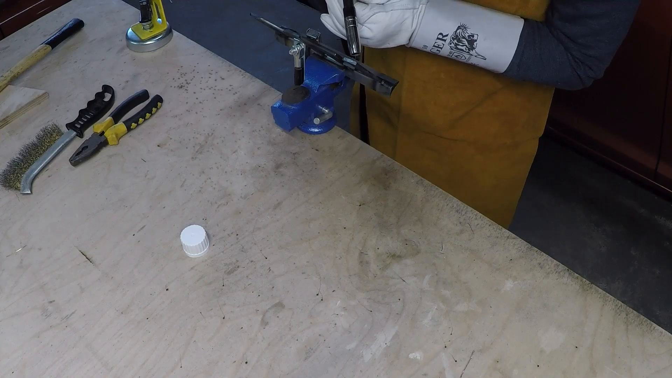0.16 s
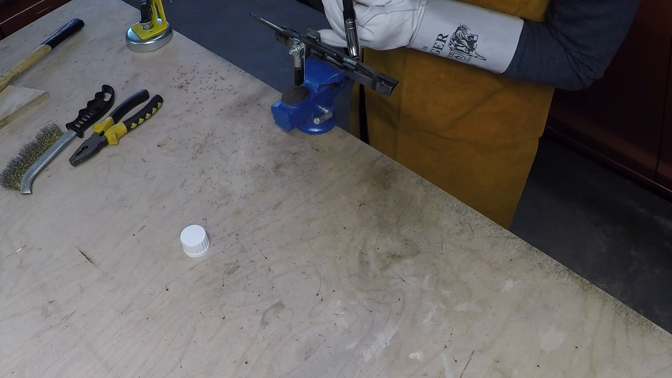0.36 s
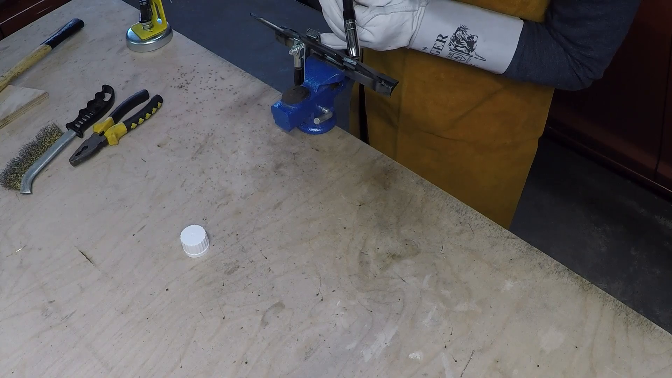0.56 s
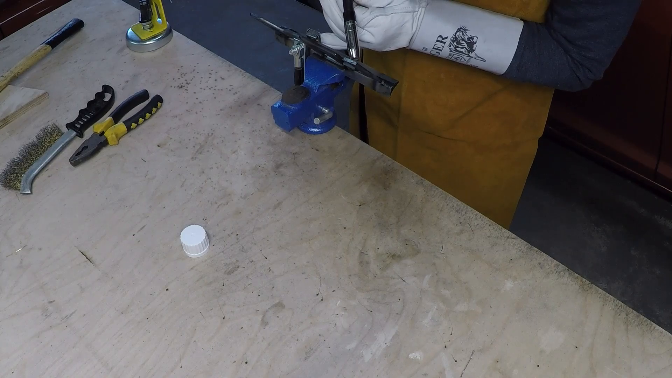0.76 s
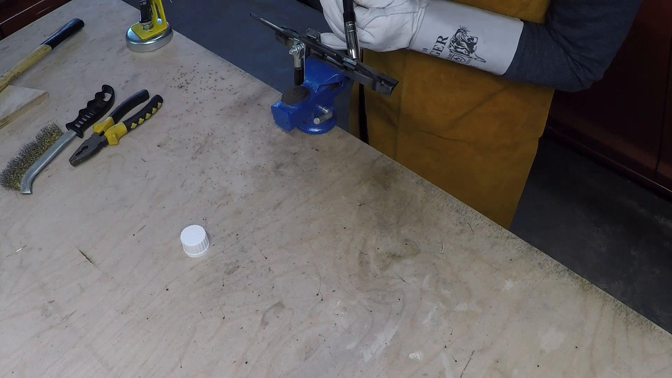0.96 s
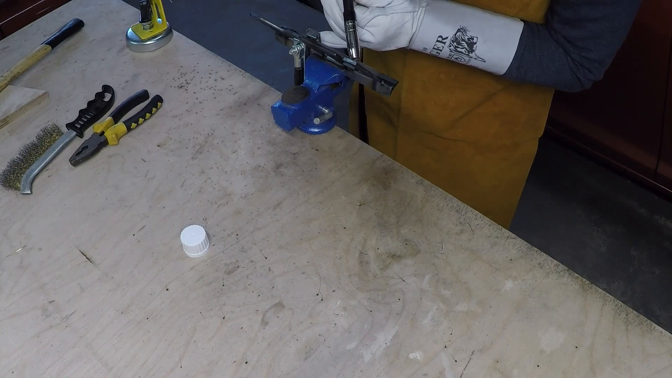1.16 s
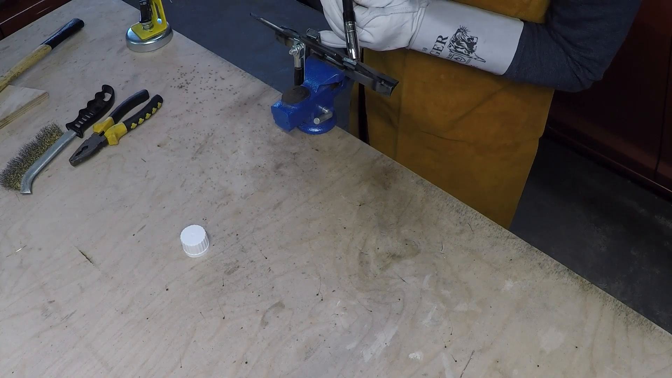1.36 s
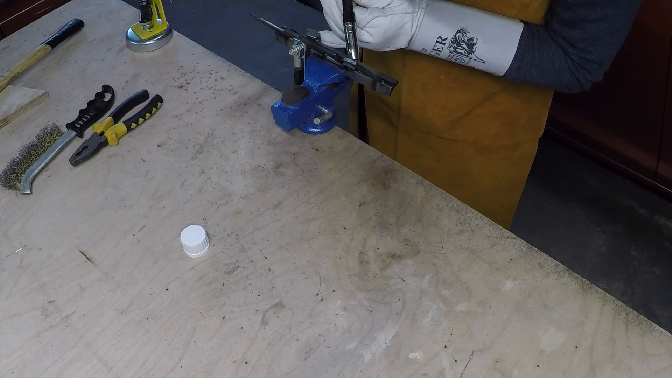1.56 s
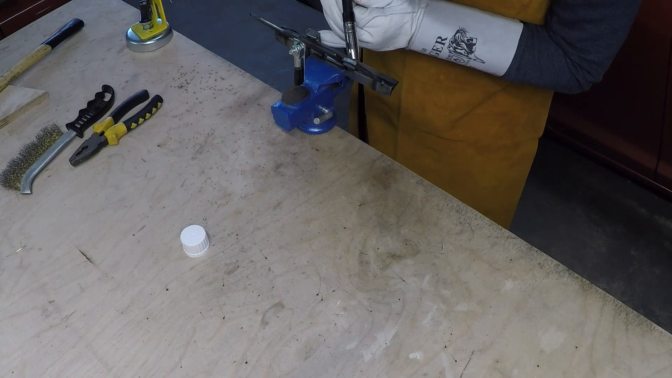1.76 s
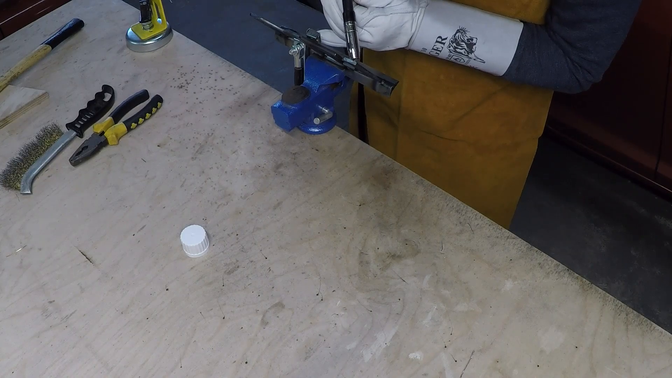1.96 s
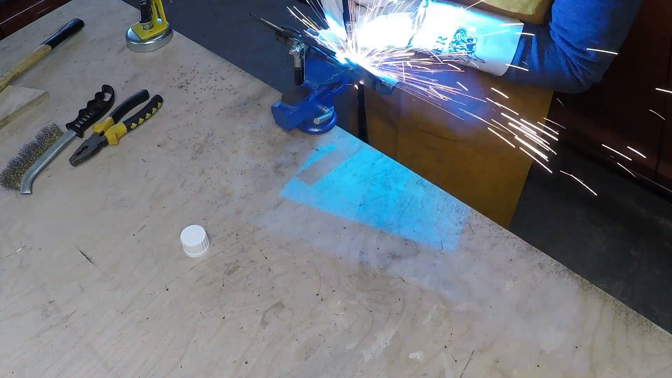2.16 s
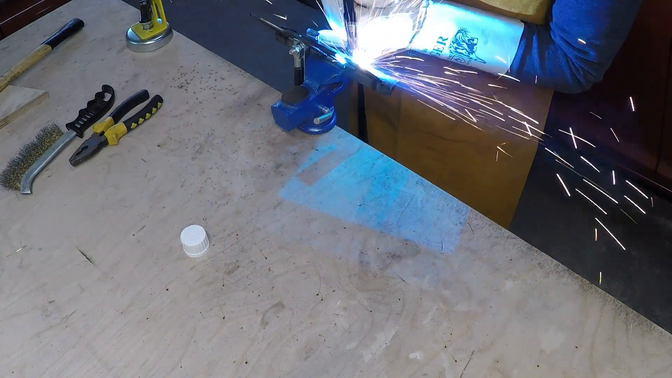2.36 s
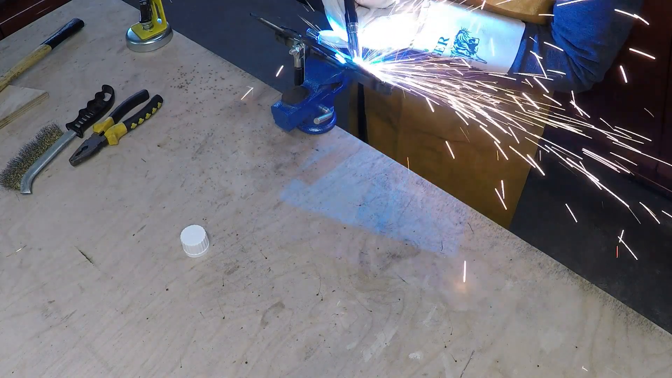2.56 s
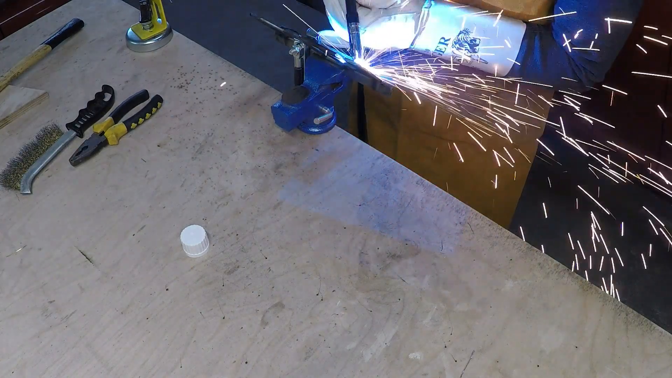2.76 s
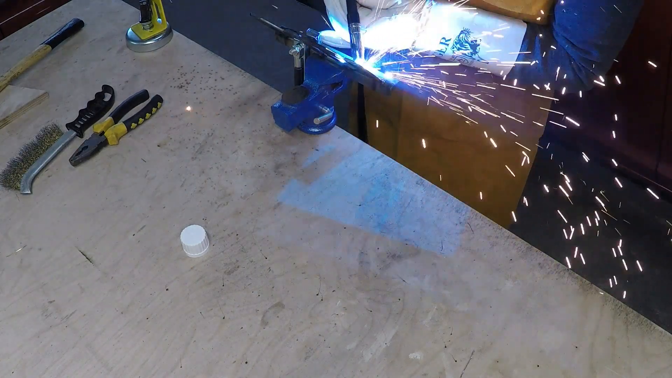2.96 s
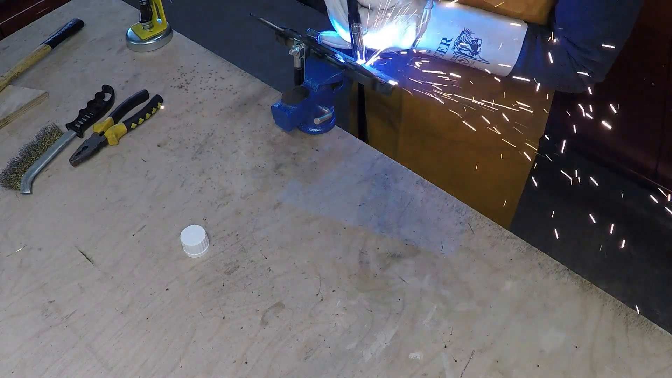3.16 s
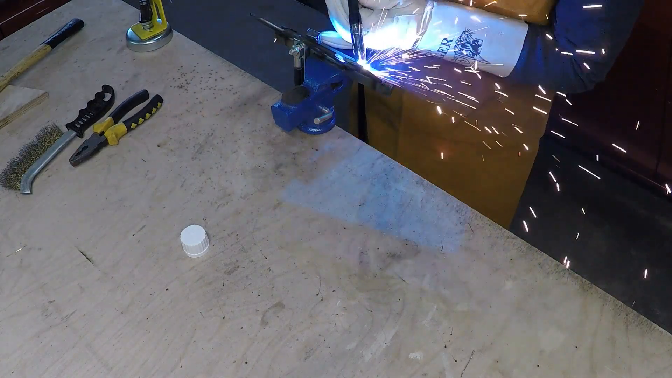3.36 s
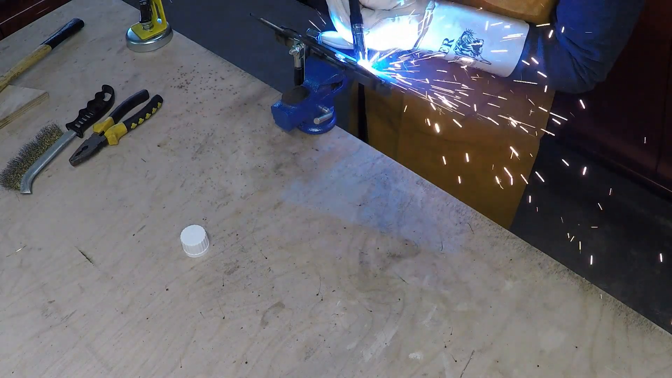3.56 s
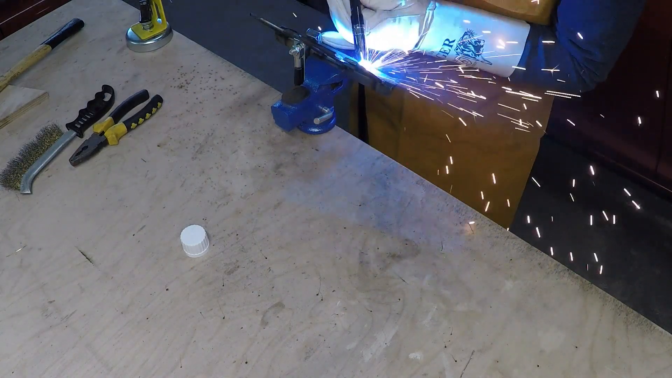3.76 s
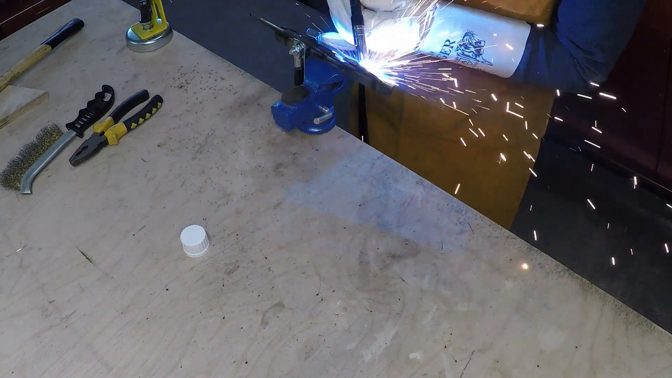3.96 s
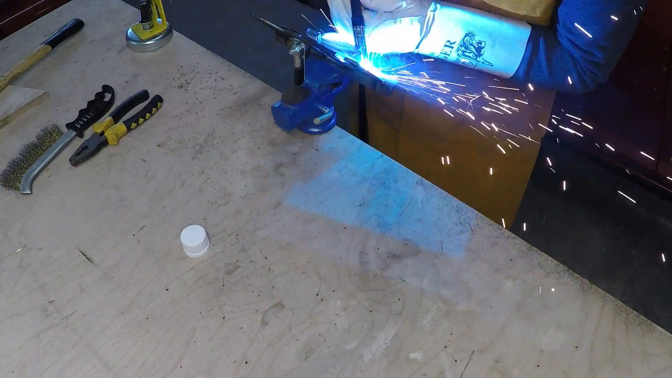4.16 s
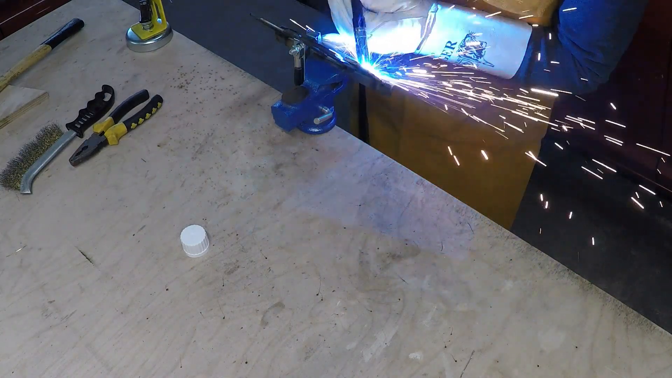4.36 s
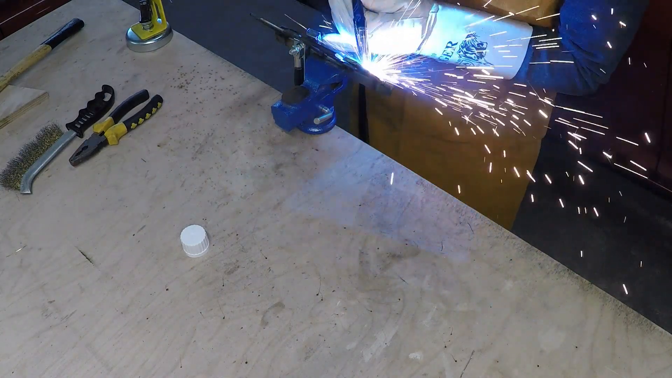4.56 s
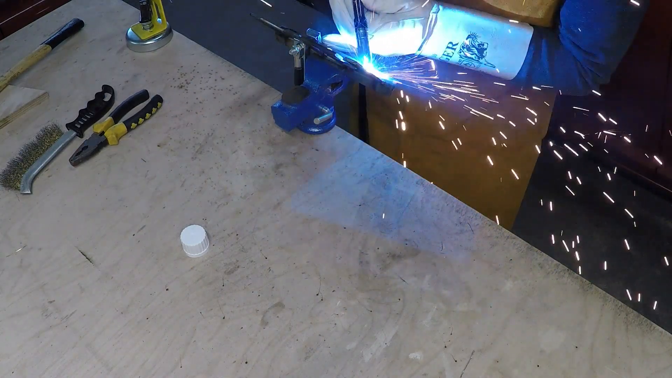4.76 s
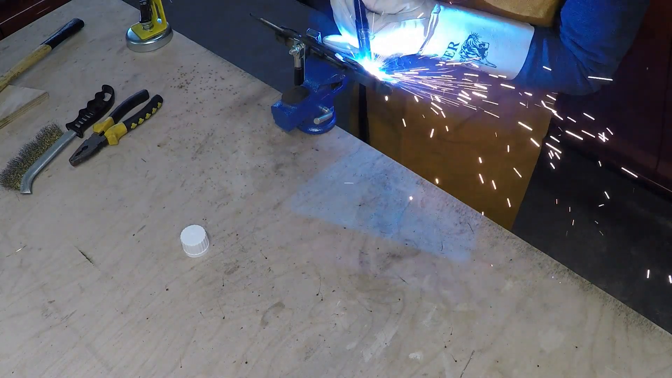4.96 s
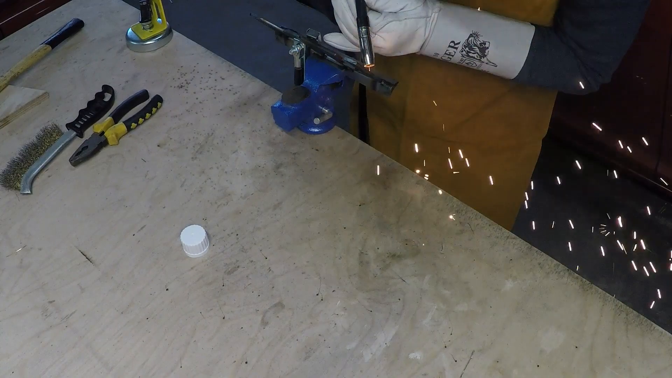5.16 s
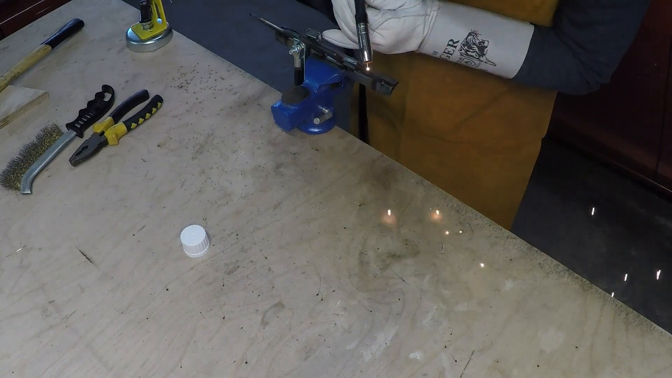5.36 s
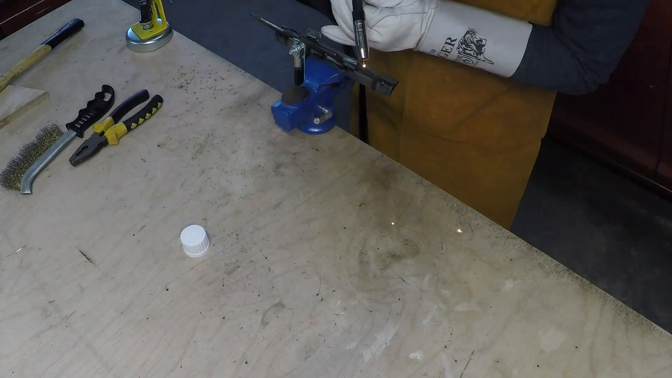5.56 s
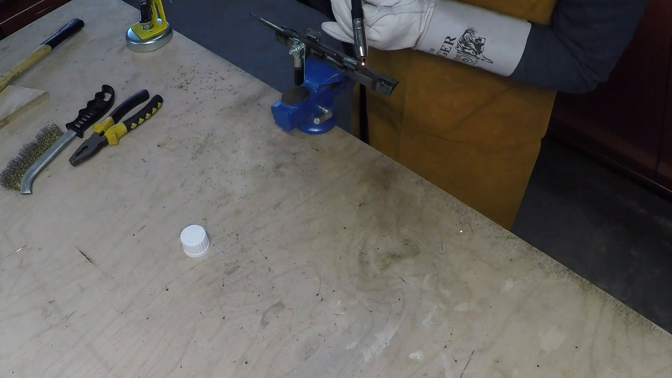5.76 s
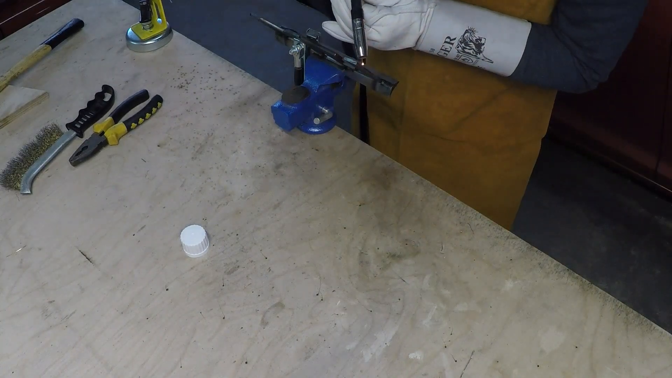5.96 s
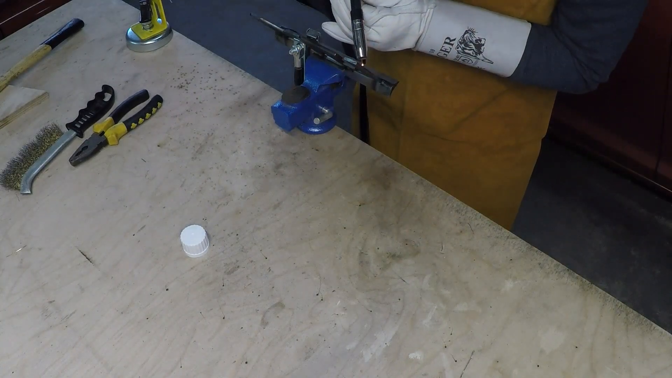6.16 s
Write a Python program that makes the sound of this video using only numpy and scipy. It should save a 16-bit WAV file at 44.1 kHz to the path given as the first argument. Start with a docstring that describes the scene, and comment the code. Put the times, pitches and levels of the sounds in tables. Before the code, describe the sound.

For almost two seconds a workshop is quiet: faint steady hiss, a barely audible very high whine, soft low rumble and dull little ticks about ten times a second. At 1.93 s a gas valve opens with a small thump and airy puff, swelling into a bright hiss. At 2.17 s the arc strikes with a heavy bang and a short low roar, most unsteady until 2.5 s. Until 5.1 s there is loud, dry, ragged crackling, roughly a hundred uneven sharp pops a second, with stronger snaps, tiny flurries, brief hesitations and fine spatter ticks; low thuds return from about 4.4 s. The pops are close, harsh and clipped, with hard reflections and a lively room. At 5.11 s it stops, its echo decaying. A cooling fan's low hum and rushing air emerge and grow; a thin gas whistle rises around 5.5 s and ends near 5.7 s. Fan and rumble continue to 6.2 s.

```python
"""Faint hiss, a thin whine, a rumble and soft ticks fill a workshop; then shielding gas puffs and hisses.
A mono microphone stands close to a small part in a vise: a welding arc strikes with a bang and crackles.
Each pop is a pressure shock as a short circuit breaks, reflected by vise, part, bench and walls.
Dull thuds are pressure dips; hiss, gas, roar and rumble are coloured noise.
As the arc goes out a cooling fan is heard, tones in a rush of air, and the gas whistles as it stops."""
import sys
import numpy as np
from scipy import signal
from scipy.fft import rfft, irfft
from scipy.io import wavfile
from scipy.ndimage import uniform_filter1d

SR = 44100
rng = np.random.default_rng(int(sys.argv[2]) if len(sys.argv) > 2 else 0)


def store_wav(level_fs):
    """Save 16-bit WAV to argv[1]."""
    pcm = np.round(np.clip(np.atleast_2d(level_fs), -1, 1) * 32767)
    wavfile.write(sys.argv[1], SR, pcm.T.astype(np.int16))


N = 273861
TIME = np.arange(N) / SR

# gas flow at the nozzle, its first row the opening of the valve: time_s, level_db
GAS_FLOW = [(1.932, -60), (1.934, -43), (1.96, -29), (2.01, -18), (2.15, -14), (2.165, -21), (2.3, -27),
            (5.1, -27.5), (5.2, -50), (5.4, -50.5), (5.67, -43.5), (5.71, -62)]


def gain_of(db):
    """Amplitude factor for a level in dB."""
    return 10 ** (np.asarray(db) / 20)


def evened(x):
    """Scales a signal to an RMS of one."""
    return x / np.sqrt(np.mean(x ** 2) + 1e-20)


def read(points, hz):
    """Reads a curve over frequency, straight between its points on a log scale."""
    f, value = np.transpose(points)
    return np.interp(np.log(hz + 1), np.log(f + 1), value)


def level(curve):
    """Amplitude over time from a dB curve: near silence before it, its last value held after it."""
    s, db = np.transpose(curve)
    return gain_of(np.interp(TIME, s, db, left=-120, right=db[-1]))


def train(rows):
    """One click of the given size at each listed time."""
    s, db = np.transpose(rows)
    return np.bincount(np.round(s * SR).astype(int), gain_of(db), N)[:N]


def noise(colour, patchy_db):
    """Random short-time spectra of a given colour, with drifting patches, at an RMS of one."""
    frames, hz = N // 256 + 5, np.fft.rfftfreq(1024, 1 / SR)
    real, imaginary, patches = rng.standard_normal((frames, 513, 3)).T
    patches = uniform_filter1d(patches, size=10, axis=0)  # across frequency
    patches = evened(uniform_filter1d(patches, size=12, axis=1))  # across time
    shape_db = read(colour, hz)[:, None] + patchy_db * patches
    spectra = (real + 1j * imaginary) * gain_of(shape_db)
    return evened(signal.istft(spectra, nperseg=1024, noverlap=768)[1][:N])


def sine(hz):
    """A steady tone at an RMS of one."""
    return np.sqrt(2) * np.sin(2 * np.pi * hz * TIME)


def hiss():
    """The faint steady hiss of the room, as patchy noise."""
    # colour of the hiss: freq_hz, relative_density_db
    colour = [(260, -7), (450, -4.5), (958, -8), (11600, -20.5), (14200, -30), (15600, -22.5)]
    return gain_of(-55.5) * noise(colour, patchy_db=1.5)


def whine():
    """A very faint high tone that lasts until the gas valve opens."""
    return gain_of(-76) * sine(13674) * (TIME < GAS_FLOW[0][0])


def rumble():
    """Low rumble under the whole scene, as noise that changes slowly in level."""
    # rumble: time_s, level_db
    swell = [(0, -42), (2.3, -44), (5.1, -50), (5.3, -52), (6.21, -36)]
    # colour of the rumble: freq_hz, relative_density_db
    colour = [(10, 7), (35, -2), (70, -9.5), (200, -17), (450, -36), (900, -72)]
    return level(swell) * noise(colour, patchy_db=1.5)


def thud(dip_ms, rebound_ms):
    """A pointed pressure dip and a slow, weaker rebound of equal area."""
    ms = np.arange(-441, 2205) / SR * 1000
    after = np.maximum(ms, 0)
    dip = np.exp(-(abs(ms) / dip_ms) ** 1.4)
    rebound = after * np.exp(-after / rebound_ms)
    return rebound * dip.sum() / rebound.sum() - dip


def thuds():
    """Dull low pressure dips at listed times, and the shorter soft ticks of the quiet opening."""
    # soft ticks, about ten a second before the gas opens: time_s
    tick_times = [.017, .143, 0.234, .324, .424, 0.525, 0.63, .731, 0.864, .953, 1.044, 1.139, 1.242, 1.345,
                  1.448, 1.552, 1.674, 1.762, 1.857]
    # dull low thuds: time_s, depth_db
    heavy = [(1.947, -15.5), (2.176, 3.5), (2.197, -7), (2.282, -1.5), (2.438, -5.5), (2.502, -17.5),
             (4.434, -17), (4.457, -10), (4.482, -11.5), (4.506, -6), (4.533, -15), (4.567, -18),
             (4.612, -11.5), (4.633, -11), (4.662, -11), (4.711, -13.5), (4.804, -18), (4.841, -10),
             (4.877, -17), (4.938, -16), (4.962, -12), (4.988, -17), (5.115, -15), (6.084, -29.5)]
    tick_db = -31 + 1.2 * rng.standard_normal(len(tick_times))
    ticks = signal.oaconvolve(train(np.c_[tick_times, tick_db]), thud(dip_ms=1.4, rebound_ms=4.0))
    low = signal.oaconvolve(train(heavy), thud(dip_ms=1.7, rebound_ms=13.0))
    return (low + ticks)[441:N + 441]  # puts the point of each dip on its listed time


def gas():
    """Shielding gas: a turbulent jet, a short puff through the hose and a faint whistle as it dwindles."""
    # colour of the jet: freq_hz, relative_density_db
    jet_colour = [(300, -26), (1240, -16), (1880, -3), (2140, -8), (3290, -15), (4500, -2), (5100, 1),
                  (6200, -2), (6920, -11), (8300, -2), (10300, -3), (13200, -10), (15600, -15)]
    # puff as the valve opens: time_s, level_db
    puff = [(1.932, -28), (1.95, -27.5), (1.99, -26), (2.0, -120)]
    # colour of the puff through the hose: freq_hz, relative_density_db
    hose_colour = [(1700, -20.5), (2400, -11.5), (3000, -22)]
    # whistle in the nozzle: time_s, level_db
    whistle = [(5.35, -75), (5.5, -53), (5.66, -44), (5.7, -87)]
    # colour of the whistle: freq_hz, relative_density_db
    nozzle_colour = [(4850, -40), (5020, -5), (5250, -30), (5650, -15), (5900, -44)]
    flow = level(GAS_FLOW) * noise(jet_colour, patchy_db=1.0)
    flow = flow + level(puff) * noise(hose_colour, patchy_db=1.0)
    return flow + level(whistle) * noise(nozzle_colour, patchy_db=2.5)


def roar():
    """The unsteady young arc roars low, loudest at first, as patchy noise."""
    # roar: time_s, level_db
    swell = [(2.168, -60), (2.175, -4), (2.22, -18.5), (2.3, -21), (2.33, -18.5), (2.45, -20.5),
             (2.5, -31.5), (5.2, -35), (5.25, -71)]
    # colour of the roar: freq_hz, relative_density_db
    colour = [(20, -1), (250, -4), (400, -20.5), (900, -25)]
    return level(swell) * noise(colour, patchy_db=2.5)


def shock(ms):
    """A sharp rise in pressure and a longer suction behind it; ms is the length of the push."""
    u = np.maximum(np.arange(-8, 200) + .76, 0) / SR * 1000 / ms
    return 5.0 * u * (1 - u) * np.exp(-.585 * u ** 2)


def strike():
    """The cold wire explodes: a few ms of low-pitched crackle that dies in a rough tail."""
    strike_s = 2.1708
    t = np.maximum(TIME - strike_s, 0)
    fading = np.exp(-t / 0.0014) + gain_of(-22.5) * np.exp(-t / 0.021)
    body = (TIME > strike_s) * fading * rng.standard_normal(N)
    return gain_of(-0.5) * signal.oaconvolve(body, shock(ms=.1))[:N]


def short_circuits():
    """Breaks of the short circuits, as time_s and relative_db; a longer wait builds a bigger drop."""
    # strong breaks, and those that open or close a run: time_s, relative_db
    strong = [(2.2288, 2), (2.2917, 2), (2.3186, 0), (2.3497, -1), (2.365, 3), (2.3738, 3), (2.3813, 3),
              (2.4333, 4), (2.4397, 3), (2.4691, 2), (2.4814, 2), (2.4971, 3), (2.5093, 3), (2.5491, 4),
              (2.5968, 2), (2.6404, 3), (2.6579, 0), (2.69, 3), (2.7218, 3), (2.757, 1), (2.7988, 4),
              (2.8106, 3), (2.8452, 2), (2.8653, 2), (2.8945, 1), (2.9391, 5), (2.9636, 4), (3.0142, -2),
              (3.0425, 4), (3.064, 3), (3.0862, 3), (3.1105, 1), (3.1808, 2), (3.2152, 2), (3.2575, 2),
              (3.3037, 1), (3.3511, 4), (3.358, 3), (3.3659, 3), (3.3786, 5), (3.3987, 1), (3.428, -2),
              (3.4604, 5), (3.4905, 2), (3.5092, 0), (3.5739, 5), (3.619, 3), (3.6696, -4), (3.7003, 4),
              (3.73, 3), (3.765, 5), (3.792, 1), (3.8149, 0), (3.851, 3), (3.8806, 2), (3.8984, 1),
              (3.9487, 3), (3.9775, 3), (4.0095, 3), (4.0339, 5), (4.0625, 5), (4.0826, 2), (4.1353, 3),
              (4.1829, 3), (4.2205, 3), (4.2271, 3), (4.2818, 3), (4.2927, 4), (4.3253, 4), (4.3354, 4),
              (4.3773, 2), (4.4294, 3), (4.453, 5), (4.4779, 4), (4.5022, 5), (4.529, 3), (4.5808, 0),
              (4.6087, 4), (4.6292, 4), (4.6586, 3), (4.7066, 3), (4.7188, 4), (4.8, 2), (4.8366, 4),
              (4.8488, 3), (4.8832, 3), (4.9025, 3), (4.934, 3), (4.9582, 4), (4.9708, 4), (5.0088, 3),
              (5.032, 3), (5.0523, 3), (5.0939, 0), (5.1107, 4)]
    # no ordinary pops between the two strong ones around each of these: time_s
    stalls = [2.3, 2.99, 3.39, 3.5, 3.8, 3.89, 5.1]
    # short circuits between the strong ones: time_s, rate_per_s
    rate = [(2.23, 165), (2.44, 160), (2.51, 80), (2.62, 135), (2.72, 75), (2.83, 130), (3.15, 120),
            (3.28, 75), (3.33, 145), (3.41, 80), (3.54, 115), (3.6, 85), (3.74, 125), (3.85, 70),
            (3.93, 150), (4.0, 75), (4.15, 125), (4.3, 95), (4.47, 82), (4.76, 105), (4.98, 80),
            (5.07, 120)]
    # quick runs of small pops start here: time_s
    flurries = [2.631, 2.83, 2.918, 3.33, 3.738, 3.926, 4.065]
    burn_back = .05  # longer relative wait after a strong pop, per dB
    uneven, spread_db = .2, 2.  # scatter of the waits (log) and of the strengths
    usual_db, per_doubling_db = -.5, 3.  # ordinary pop after 10 ms; more for each doubled wait
    flurry_gap_s, flurry_db, flurry_size = .0042, -3, 3

    rows = list(strong)
    chance = rng.standard_normal((len(strong), 16, 2))
    for (start, db), (end, _), luck in zip(strong, strong[1:], chance):
        count = round((end - start) * np.interp((start + end) / 2, *np.transpose(rate)))
        if count < 2 or any(start < s < end for s in stalls):
            continue
        waits = np.exp(uneven * luck[:count, 0])
        waits[0] *= 1 + burn_back * max(db, 0)
        waits = waits * (end - start) / waits.sum()
        strength = usual_db + per_doubling_db * np.log2(waits * 100) + spread_db * luck[:count, 1]
        # the last wait ends on the next strong pop
        rows += zip((start + np.cumsum(waits))[:-1], strength[:-1])

    for start, luck in zip(flurries, rng.standard_normal((len(flurries), flurry_size, 2))):
        gaps = flurry_gap_s * np.exp(uneven * luck[:, 0])
        rows += zip(start + np.cumsum(gaps), flurry_db + spread_db * luck[:, 1])
    return np.array(sorted(rows))


def arc():
    """Each pop mixes a short and a long shock; strong pops hold the plasma longer; spatter ticks between."""
    s, db = short_circuits().T
    jitter_s = 1e-4 * (rng.random(len(s)) - .5)
    clicks = train(np.c_[s + jitter_s, db])
    burning = (TIME > s[0]) & (TIME < s[-1])
    spatter = rng.exponential(1, N) * (rng.random(N) < 80 / SR)  # about 80 ticks a second
    clicks = clicks + gain_of(-21) * spatter * burning
    long_share = np.clip(.3 * clicks + .12 * rng.standard_normal(N), 0, 1)
    short = signal.oaconvolve(clicks * (1 - long_share), shock(ms=.045))
    long = signal.oaconvolve(clicks * long_share, shock(ms=.058))
    return gain_of(0.6) * (short + long)[16:N + 16]  # makes up for the delays in shock and bench


def drifted(x):
    """The colour of the crackle drifts along the weld: the lows and low mids, and the top treble."""
    # drift: time_s, low_db (before half the plain signal is taken off), top_lift_db
    drift = [(2.2, 6.5, 9), (2.55, 0, 3), (2.9, 0, 2.5), (3.6, -0.5, 2), (4.0, 2, 1), (4.5, 3, 1),
             (5.1, 3, 2)]
    s, low_db, top_db = np.transpose(drift)
    low = signal.sosfiltfilt(signal.butter(2, 1430, fs=SR, output="sos"), x)
    top = signal.sosfiltfilt(signal.butter(2, 9900, "high", fs=SR, output="sos"), x)
    low_change = level(np.c_[s, low_db]) - 1.5
    top_change = level(np.c_[s, top_db]) - 1
    return x + low_change * low + top_change * top


def bench():
    """Direct sound, near reflections and a scatter of weak ones, with the treble lift of the microphone."""
    # reflections from the vise, the part and the bench: delay_ms, signed_gain
    echoes = [(.204, .23), (.249, .57), (.488, .48), (.782, .29), (.941, -.38), (1.156, -.25), (1.383, .58),
              (1.44, -.49), (1.644, .37), (1.916, -.31), (2.132, .33), (2.177, -.28), (2.381, .35),
              (2.619, .4), (2.698, -.25), (2.959, -.27), (3.583, .26), (3.651, -.27), (3.98, .27),
              (4.252, .27)]
    # colour of the pops close by: freq_hz, gain_db
    colour = [(170, -4), (480, -11.5), (850, 3.5), (1000, 3.5), (1220, 1), (1700, 2.5), (3000, 2.5),
              (3800, -0.5), (5000, 3.5), (5500, -1.5), (7300, 1), (8000, 1), (9200, -2), (11000, 0.5),
              (14800, 6.5)]
    t, hz = np.arange(512) / SR, np.fft.rfftfreq(512, 1 / SR)
    scatter = gain_of(-31) * rng.standard_normal(512) * (t < .0048)
    taps = 1 + rfft(scatter)
    for ms, gain in echoes:
        taps = taps + gain * np.exp(-2j * np.pi * hz * ms / 1000)
    delay = np.exp(-2j * np.pi * hz * 8 / SR)  # 8 samples
    return irfft(taps * delay * gain_of(read(colour, hz)))


def room(x):
    """The walls: sparse taps of random sign after a short gap, each band dying at its own speed."""
    # colour by way of the walls: freq_hz, relative_db
    colour = [(60, -13), (400, -8), (800, 7.5), (1700, -3), (4800, 4), (5600, -0.5), (8000, 4),
              (14500, 9.5)]
    # dying away of the room: freq_hz, t60_s
    decay = [(250, 1.5), (660, 0.99), (1740, 1.37), (4590, 1.26), (12100, 0.44)]
    taps = np.zeros(SR)
    slots = np.arange(260, SR - 12, 12)
    at = slots + rng.integers(0, 12, len(slots))
    taps[at] = rng.choice([-1., 1.], len(at))
    hz, t, spectra = signal.stft(taps, SR, nperseg=256)
    shape_db = read(colour, hz)[:, None] - 60 * t / read(decay, hz)[:, None]
    tail = signal.istft(spectra * gain_of(shape_db), SR, nperseg=256)[1]
    return signal.fftconvolve(x, tail / np.linalg.norm(tail))[:N]


def fan():
    """A cooling fan: slightly wavering blade and shaft tones in a rush of air."""
    # loudness of the whole fan: time_s, gain_db
    loudness = [(5.1, -10), (5.4, -9), (5.7, -3), (5.9, -1), (6.21, 0)]
    # tones, ahead of that gain: freq_hz, level_db
    tone_table = [(72.4, -40), (217, -49), (290, -56), (362, -56), (507, -54), (870, -56), (1015, -57),
                  (1523, -54), (2030, -55)]
    # colour of the rush of air: freq_hz, relative_density_db
    air_colour = [(180, -6), (300, 0.5), (334, -5.5), (1300, -8.5), (1520, -5.5), (12000, -34.5),
                  (15600, -62), (22000, -120)]
    waver = 1 + .001 * evened(uniform_filter1d(rng.standard_normal(N), size=4000))
    warped_s = np.cumsum(waver) / SR
    tones = np.zeros(N)
    for hz, db in tone_table:
        phase = 2 * np.pi * (hz * warped_s + rng.random())
        tones += gain_of(db) * np.sqrt(2) * np.sin(phase)
    air = gain_of(-40.5) * noise(air_colour, patchy_db=.8)
    return level(loudness) * (tones + air)


def scene():
    """Sums the arc, close and by way of the walls, with the gas and the workshop, alike on both channels."""
    background = hiss() + whine() + rumble() + thuds()
    flow = gas()
    crackle = strike() + drifted(arc())
    near = signal.oaconvolve(crackle, bench())[:N]
    mono = background + flow + roar() + near + room(crackle) + fan()
    return np.array([mono, mono])


def record(dry):
    """The loudest pops are clipped flat at full scale; then a low-pass takes off the top treble."""
    clipped = np.clip(dry, -1, 1)
    low_pass = signal.firwin(511, 15700, window=("kaiser", 9), fs=SR)  # cutoff in Hz
    return signal.oaconvolve(clipped, low_pass[None], "same")


dry = scene()
out = record(dry)
store_wav(out)
```